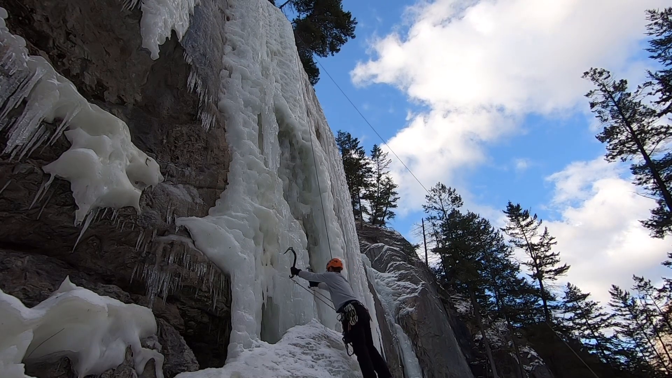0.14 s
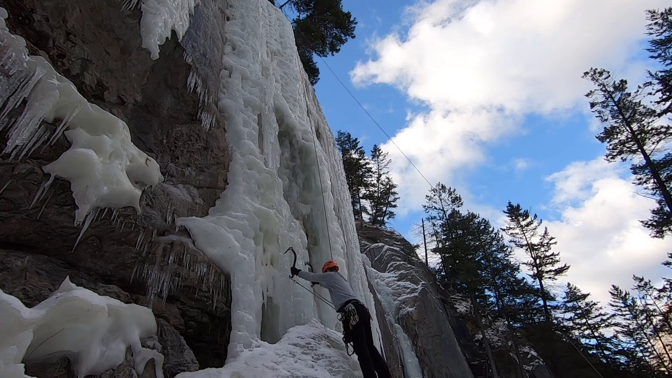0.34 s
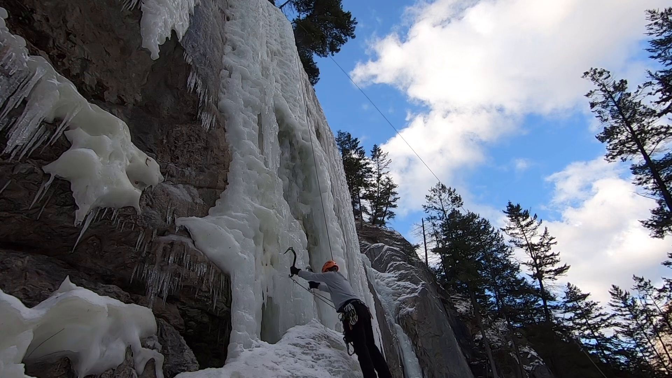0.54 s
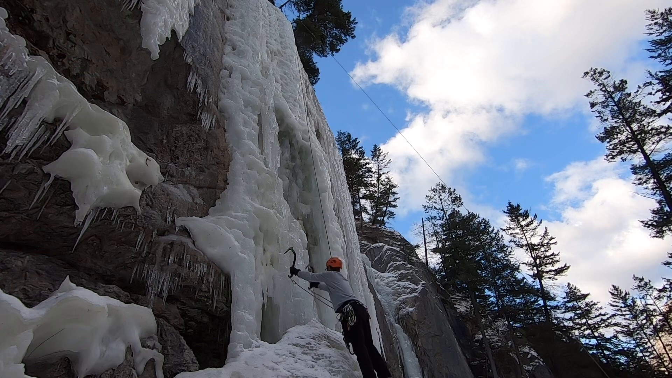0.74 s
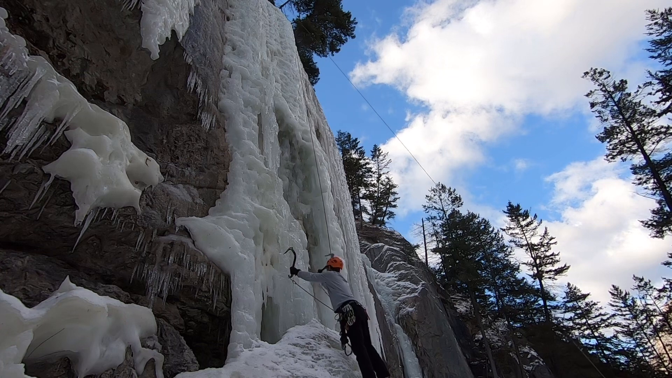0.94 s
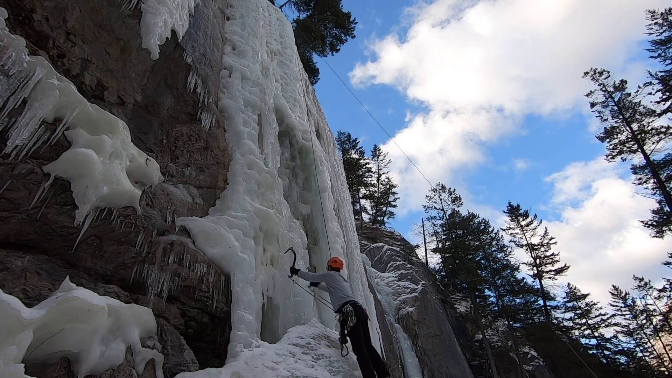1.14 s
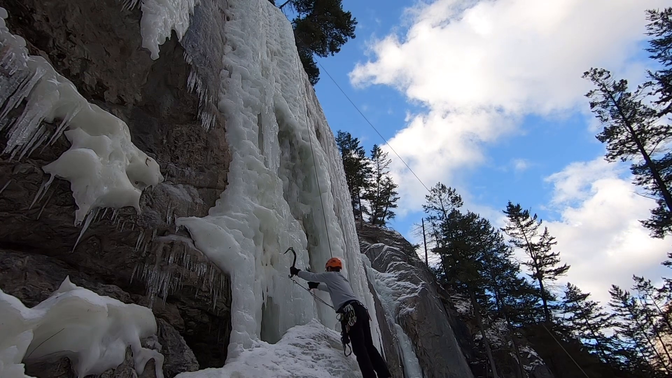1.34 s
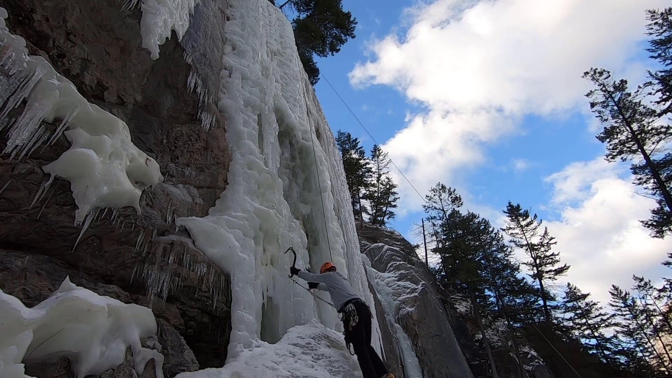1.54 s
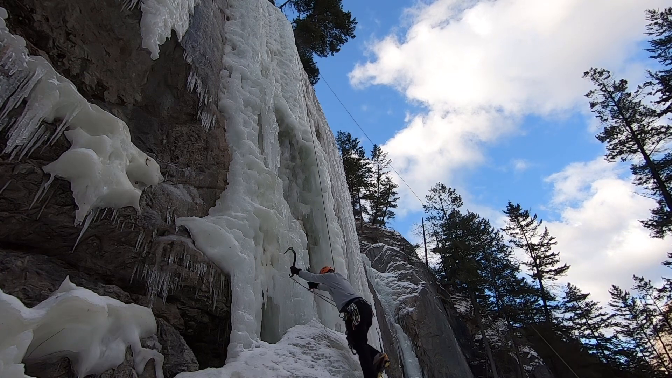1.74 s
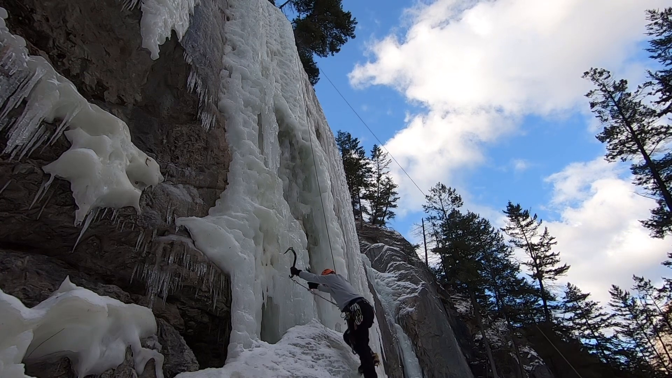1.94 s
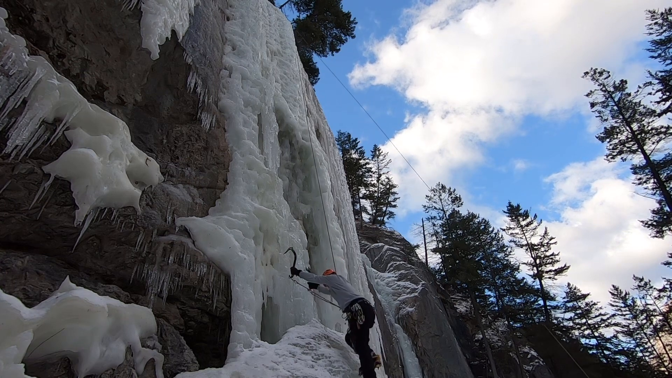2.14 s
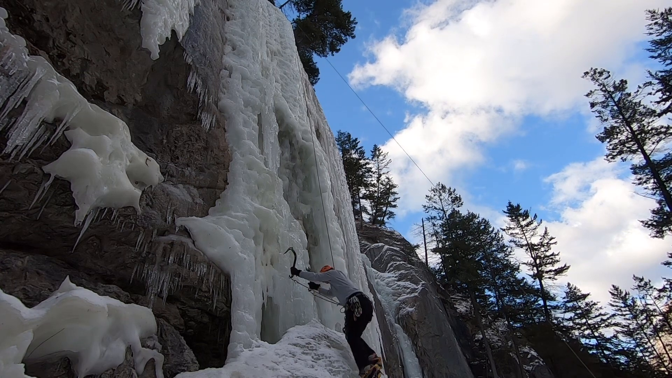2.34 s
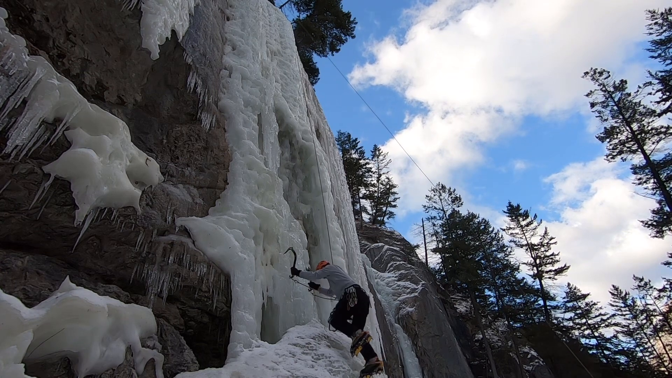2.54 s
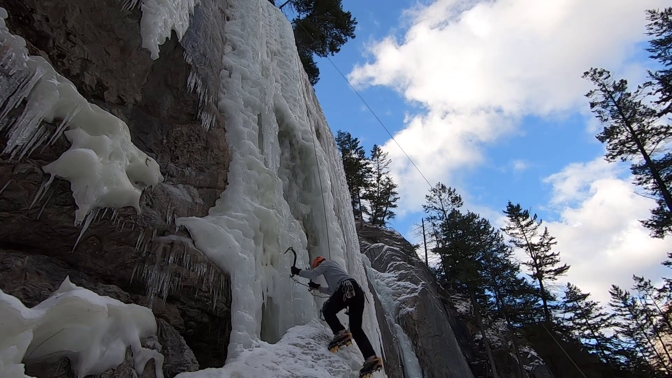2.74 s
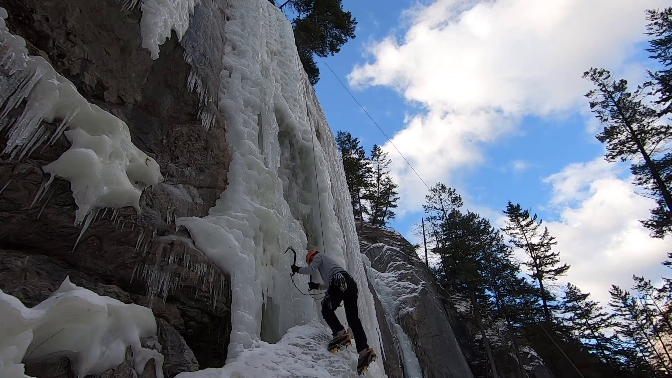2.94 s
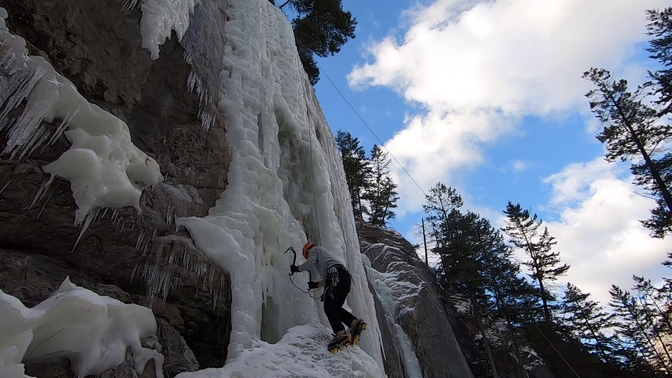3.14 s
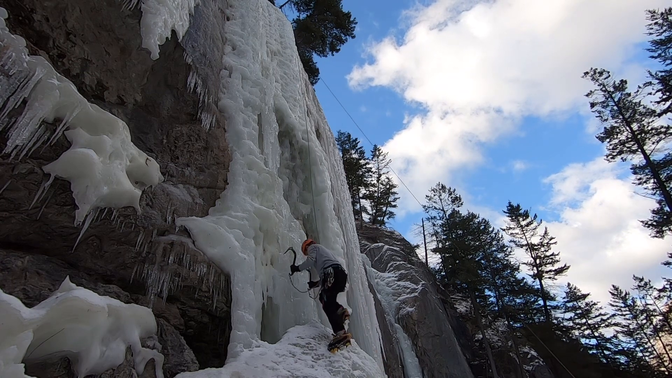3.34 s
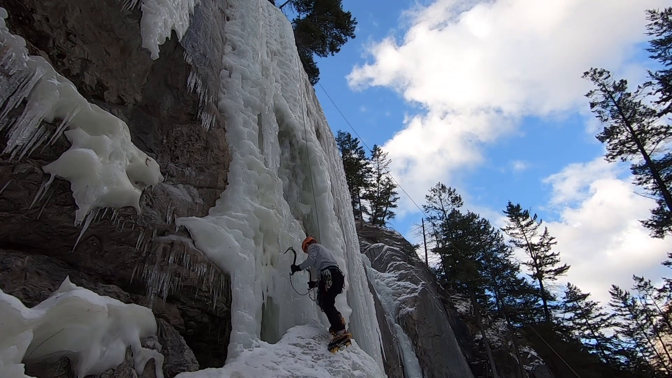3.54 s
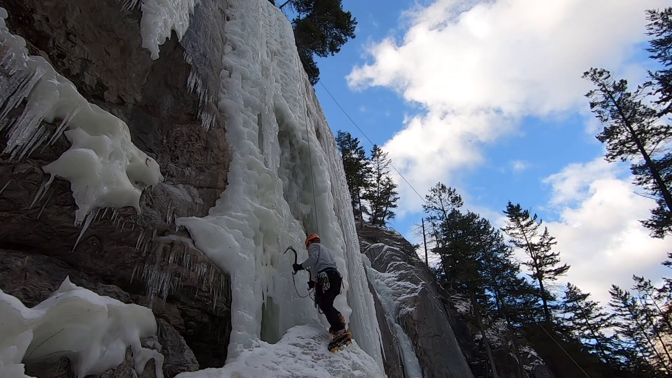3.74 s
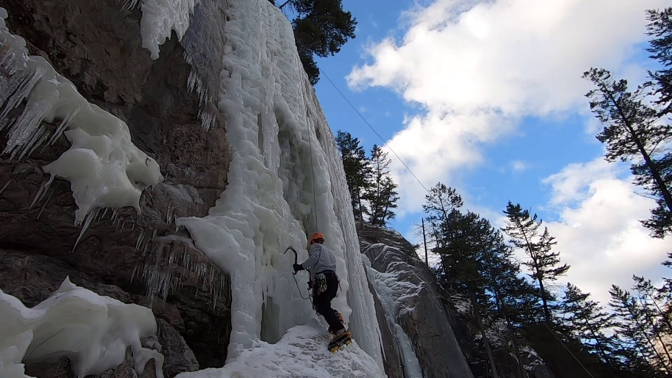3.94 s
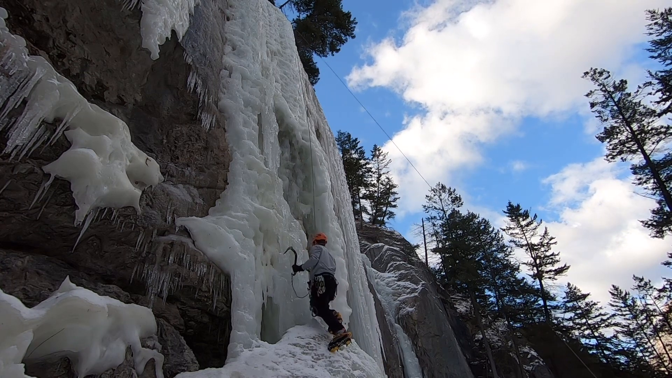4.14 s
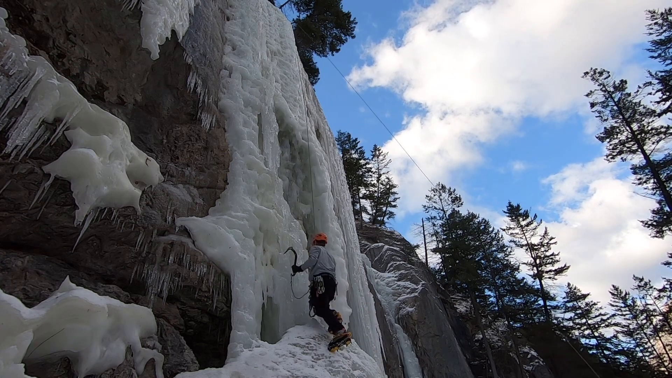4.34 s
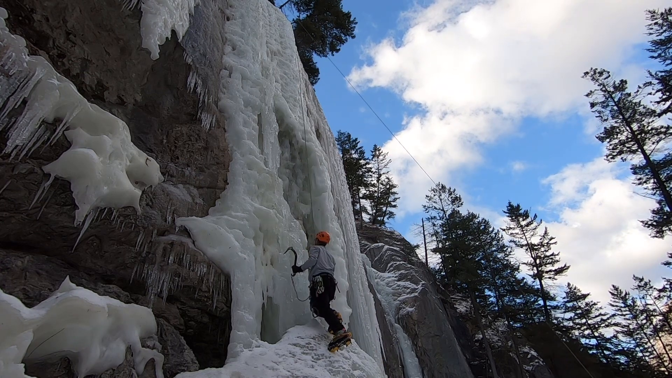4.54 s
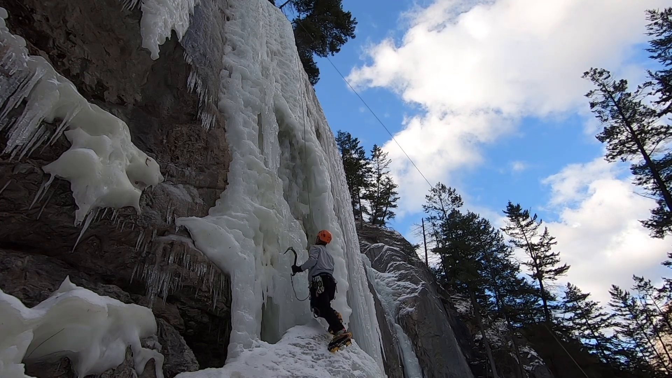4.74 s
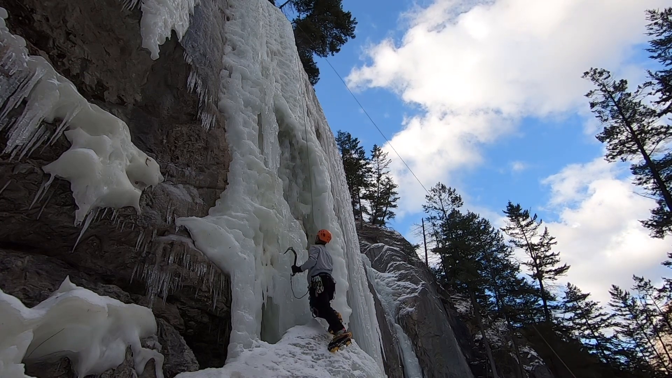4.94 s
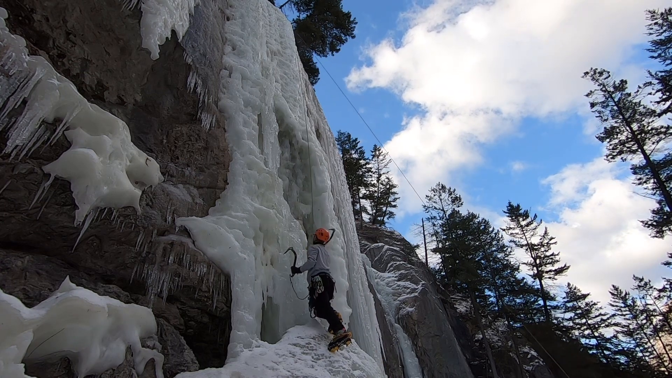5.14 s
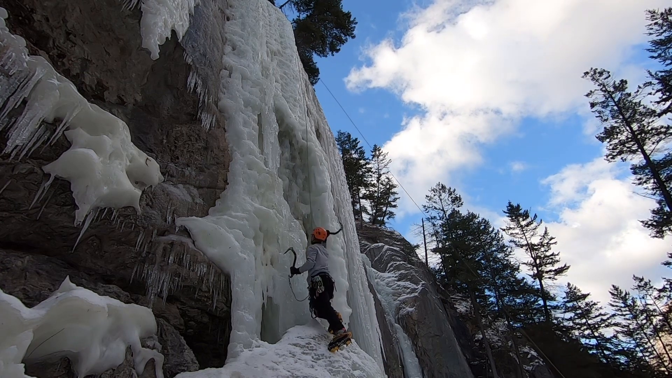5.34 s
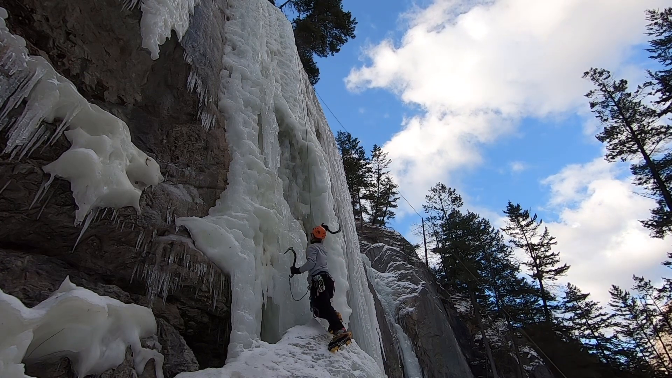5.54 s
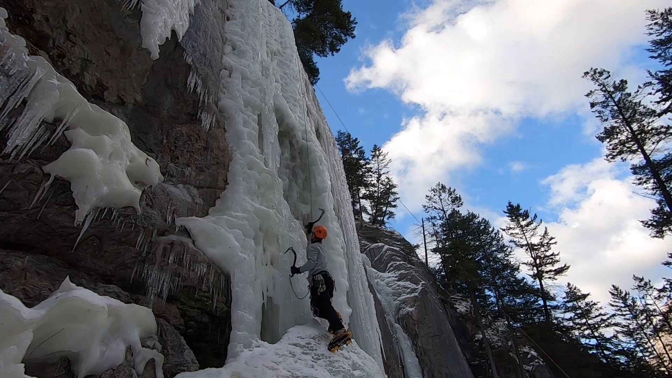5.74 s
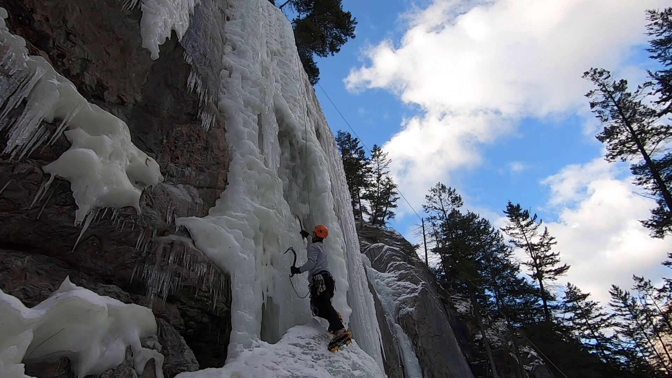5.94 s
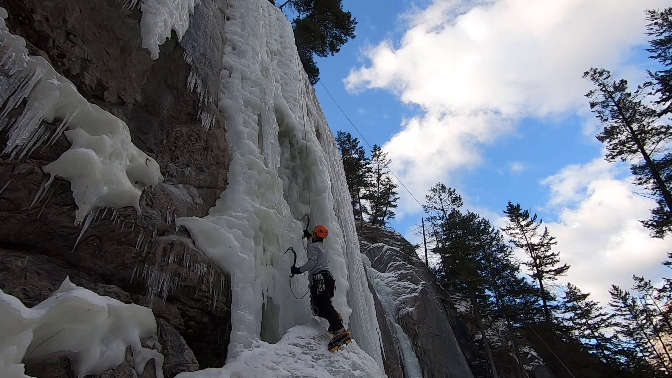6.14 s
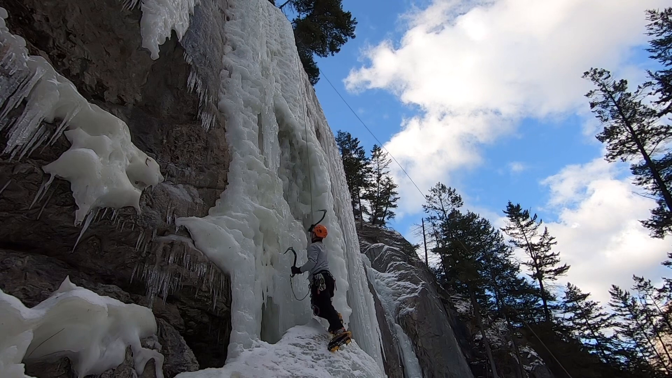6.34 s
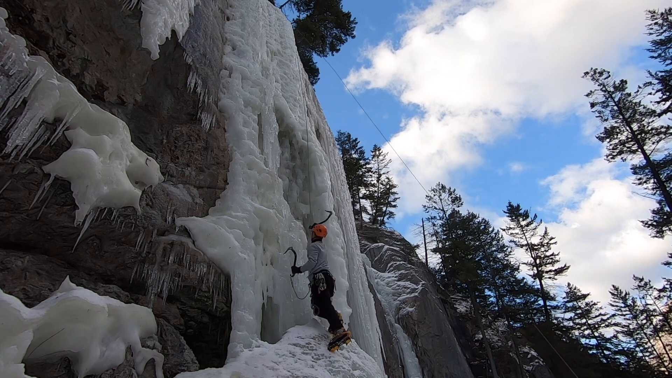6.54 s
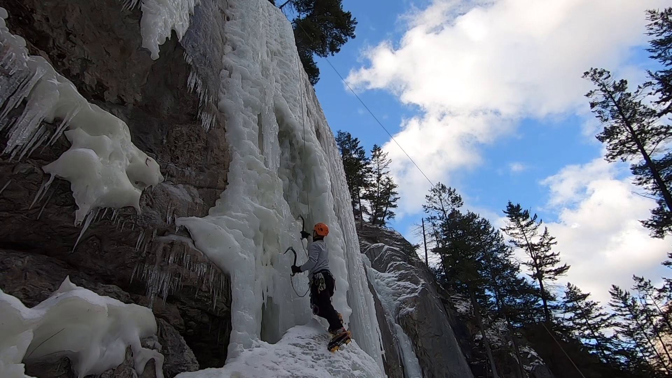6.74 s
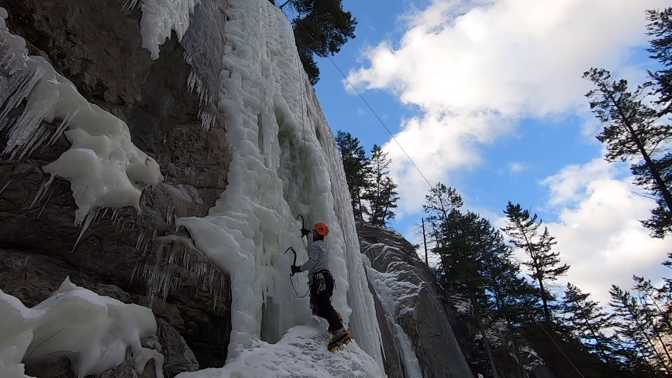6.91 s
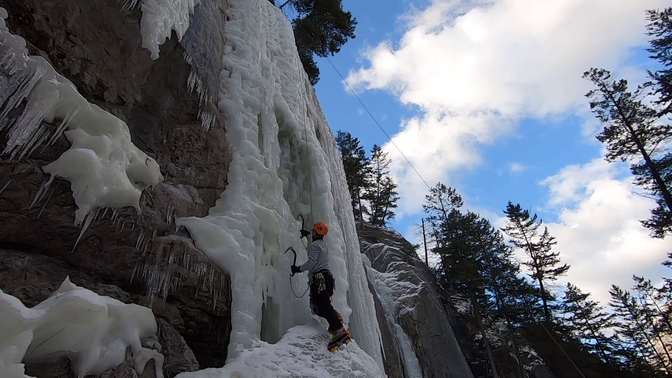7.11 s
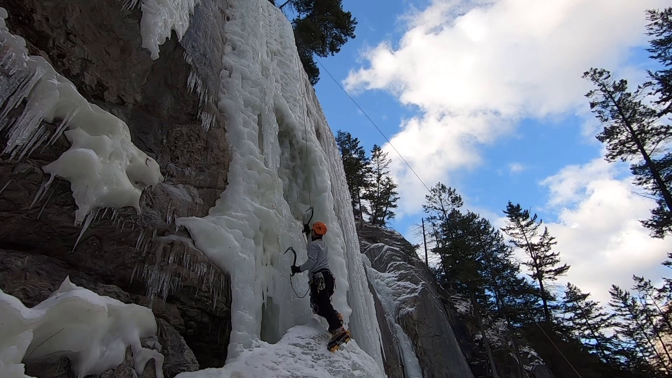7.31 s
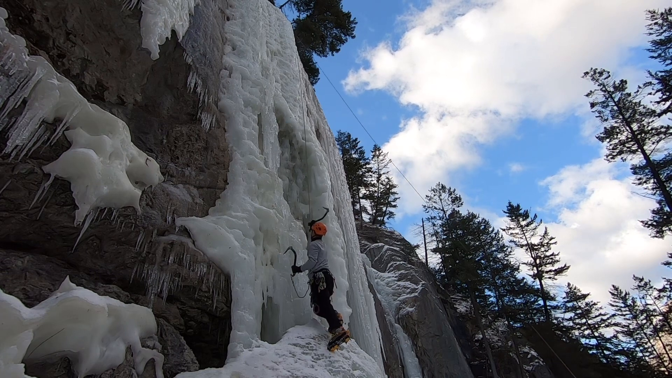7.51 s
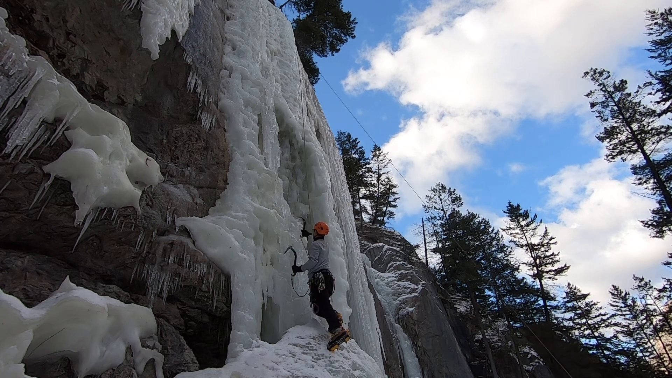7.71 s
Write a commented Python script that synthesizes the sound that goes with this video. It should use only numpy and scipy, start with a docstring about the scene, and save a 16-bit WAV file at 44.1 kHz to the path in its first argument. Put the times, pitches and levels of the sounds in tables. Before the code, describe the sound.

A soft wash of far water and air runs throughout, with faint gritty scuffing of snow and ice. The climber is some metres away, and blows on the ice have a short echo. Light steel taps click around 0.3 to 0.5 seconds, then a sharp, crunchy axe strike lands at 1.2. From about 2 to 2.8 seconds, crampon kicks and pick taps knock into slightly hollow ice, with soft low boot thuds. Small steel harness gear clinks brightly from 3 to 3.7 seconds, strongest near 3.4 along with another kick. A quieter stretch follows, with a brief scrape, a soft thud and a faint swell of air around 5.2. The loudest axe strike comes at 5.9 seconds, another at 6.7 and a last at 7.7. Small taps and scrapes fall between them, with one bright clink at 7.3.

```python
"""A wooded gully, some metres from a climber on a frozen waterfall. Axe picks and crampon points crush
the ice in bursts of tiny fractures that ring the tool and boom in the hollow curtain. Steel gear
clinks on the harness; boots thud through the snow and scuff up grit. Rock and trees throw back a
short echo over a soft bed of far water and air."""
import sys
import numpy as np
from scipy import signal
from scipy.fft import rfft, irfft
from scipy.io import wavfile

SR = 44100
rng = np.random.default_rng(int(sys.argv[2]) if len(sys.argv) > 2 else 0)


def store_pcm(level_fs):
    """Save levels as 16-bit WAV."""
    pcm = np.round(np.clip(level_fs, -1, 1) * 32767).astype(np.int16)
    wavfile.write(sys.argv[1], SR, np.atleast_2d(pcm).T)


N = 347067

# Full axe swings. Each row: start in seconds, level in dB, two tool ring centres in Hz, then ring,
# treble and boom trims in dB, rise in seconds.
AXE_SWINGS = [(1.184, -17, 2230, 1203, 5.5, -15.5, -18.5, 0.0028),
              (5.862, -11.5, 3640, 1202, -2, -18, -19.5, 0.0021),
              (6.7399, -19.5, 2230, 3200, 6, -12, -21, 0.0036),
              (7.703, -15.5, 2160, 3500, 3.5, -8, -17, 0.0042)]
# Small bites of steel on ice. Each row: start in seconds, level in dB, tool ring centre in Hz, # treble trim in
# dB, pan in dB (positive leans left, negative right).
PICK_TAPS = [(0.292, -32, 3000, -22, 0), (0.297, -31, 1850, -31, -1), (0.318, -39.5, 3460, -24, -1),
             (0.404, -34, 3820, -19, -1), (0.466, -29.5, 3420, -21, 1), (0.468, -33, 2850, -22, -3),
             (0.473, -29.5, 1490, -13, -1), (1.605, -40.5, 2800, -21, -14), (1.637, -45.5, 3300, -26, 1),
             (1.795, -42.5, 2220, -25, -21), (1.902, -41, 2400, -20, -13), (1.962, -26, 2820, -1, -3),
             (1.978, -43, 1200, 8, -1), (2.429, -24.5, 3380, -8, -4), (2.44, -36.5, 3020, 8.5, -1),
             (3.778, -41.5, 1260, -25, 0), (2.257, -41.5, 1950, 1, -4), (2.673, -46, 2810, 0, -18),
             (2.766, -25.5, 2150, -3.5, -3), (3.45, -31, 1890, 4, -8), (5.833, -34, 3500, -6, -1),
             (5.836, -28, 2600, -14, 1), (6.018, -37, 3250, -1, 2), (6.027, -29.5, 2790, -39, 2),
             (6.057, -37, 2740, -28, 3), (6.089, -39.5, 3000, -22, 2), (6.504, -34.5, 2970, -7, 1),
             (6.654, -31.5, 2440, -2.5, -6), (6.683, -38, 1100, -20, -11), (7.097, -40, 1760, -3.5, -1),
             (7.142, -38.5, 2470, -28, -12), (7.183, -53.5, 2500, 2.5, -17), (7.339, -38, 3170, -6, -18),
             (7.675, -28.5, 2250, -4, 1.5), (7.681, -27, 3600, -7, 0)]
# Crampon kicks. Each row: start in seconds, level in dB, tool ring centre in Hz, boom trim in dB,
# boom centre in Hz.
CRAMPON_KICKS = [(1.317, -45.5, 1040, 3.5, 181), (1.966, -32.5, 2500, 2, 304), (2.121, -55, 3780, 16, 277),
                 (2.389, -40, 966, 8.5, 417), (2.426, -28, 1300, 8.5, 348), (2.455, -48, 1300, 19.5, 436),
                 (2.754, -28.5, 1290, 0, 433), (3.437, -34, 1310, -3, 603), (3.777, -52, 902, 17, 317),
                 (3.945, -49.5, 999, 13, 317), (4.593, -50, 912, 9, 193), (6.613, -44, 902, 9.5, 160),
                 (7.674, -38, 1000, 3.5, 380)]
# Points dragged through ice. Each row: start in seconds, level in dB, treble and dull rub trims in dB,
# tool ring centre in Hz, pan in dB.
POINT_SCRAPES = [(0.405, -46.5, -7, -16, 2600, -1), (0.73, -51, -13, -3.5, 2220, -4),
                 (1.81, -51.5, -27, -8, 2400, -9), (1.886, -51.5, -26, -4, 1600, -20),
                 (2.65, -58, 10.5, -32, 2800, -1), (2.954, -45.5, -0.5, -14, 3740, -3),
                 (3.222, -47.5, -12, -37, 2130, -18.5), (4.51, -51.5, -22, -3, 1600, -16),
                 (5.2, -43, -11.5, -10, 1470, -22), (5.235, -42.5, -13.5, -8.5, 4100, -5),
                 (6.277, -55.5, 2.5, 0.5, 2200, -7), (7.365, -49.5, 0.5, -30, 3400, -1),
                 (7.47, -57, -8, 0, 2200, -11)]
# Modes of the tool and of the hollow ice. Each row: pitch in Hz, level in dB.
TOOL_MODES = [(1040, 3), (1200, 4.5), (1620, -3.5), (1920, 6.5), (2220, 2.5), (2780, 6.5), (3440, -7.5),
              (3850, 2), (4200, 1), (4900, -36.5)]
CURTAIN_MODES = [(134, -6.5), (315, -8), (467, -11), (629, -11)]
# Harness gear knocking. Each row: start in seconds, level in dB, pitch in Hz, pan in dB.
GEAR_CLINKS = [(0.477, -47, 7200, 2), (2.2353, -44.5, 8700, -3), (2.331, -45.5, 7030, -6.5),
               (2.8684, -47, 6840, -0.5), (2.927, -46, 7570, 0), (3.006, -32.5, 8640, -5.5),
               (3.021, -35, 7500, -7), (3.1793, -30, 7630, -6.5), (3.218, -33, 7560, -7),
               (3.333, -39, 7620, -8), (3.36, -33.5, 7770, -10.5), (3.404, -26.5, 7660, -10.5),
               (3.423, -25.5, 7930, -5.5), (3.4483, -21, 7760, -7.5), (3.466, -33.5, 8500, -15),
               (3.575, -30, 8180, -7), (3.6706, -37.5, 7950, -24.5), (3.711, -41, 7600, -5),
               (7.34, -26.5, 7900, -6), (7.585, -39.5, 8060, -5)]
# Thin steel rubbing. Each row: start in seconds, peak in dB, pitch in Hz, fade time in seconds.
GEAR_RUBS = [(0.483, -37, 6860, 0.037), (2.558, -49, 7500, 0.057), (2.662, -51, 9370, 0.2),
             (2.663, -51, 7350, 0.16), (2.573, -51, 9370, 0.039), (2.78, -44, 7900, .04),
             (3.056, -51, 12000, 0.045), (3.45, -46, 7700, .05), (3.467, -38, 9200, 0.037),
             (3.9, -51, 8350, 0.056), (7.102, -44.5, 8830, .03), (7.478, -41.5, 9390, 0.069)]
# Weight landing on a boot. Each row: start in seconds, deep push in dB, upper thud in dB.
BOOT_LANDINGS = [(1.85, -64, -70), (1.972, -44.5, -42.5), (2.42, -57, -35.5), (2.763, -58, -44),
                 (3.047, -66, -55.5), (3.449, -57, -40), (3.61, -56, -71), (4.439, -55, -57),
                 (4.794, -76, -54), (5.221, -48, -45), (6.6, -53.5, -51.5), (7.667, -61, -68)]
# Fader moves for boots, rope and loose ice. Each row: time in seconds, grit in dB, dull rub in dB.
SCUFF_LEVELS = [(0.0, -62.5, -58.5), (1.14, -77, -62), (2.06, -58, -56.5), (2.41, -63.5, -61),
                (3.51, -59, -55), (3.62, -55, -50.5), (3.88, -76.5, -57), (4.23, -71.5, -60),
                (4.65, -75, -54.5), (4.86, -71, -60.5), (5.83, -70, -63), (6.03, -53.5, -62),
                (6.4, -64, -67.5), (6.58, -61.5, -56.5), (6.73, -51.5, -46), (6.93, -64.5, -60.5),
                (7.69, -70, -65), (7.87, -58, -78)]
# EQ curves for cracks, splinters, grit and the bed. Each row: frequency in Hz, relative gain in dB.
CRACK_EQ = [(290, -51), (500, -7), (1170, -0.5), (1890, 0), (2210, -8.5), (2480, -4.5), (3490, -1.5),
            (6000, -16.5), (7800, -21.5), (13200, -120)]
SPLINTER_EQ = [(2650, -16), (4500, 9), (5220, 7), (6810, 5.5), (9560, 8), (11300, -13.5), (14100, -13),
               (16000, -42)]
GRIT_EQ = [(350, -61.5), (600, -11.5), (823, -5.5), (2040, -5.5), (3850, -6), (6180, -18), (8050, -11),
           (11600, -31.5), (14000, -38)]
WASH_EQ = [(25, -9), (86, -59), (156, -5), (285, -6.5), (593, -12), (833, -4), (1780, -18.5), (3250, -20.5),
           (5630, -23), (9010, -19.5), (10300, -28), (11700, -57), (13000, -45)]
# Width of the bed. Each row: frequency in Hz, left-right likeness (1 or more is mono, negative is wide).
WASH_LIKENESS = [(60, -0.52), (130, 0.39), (290, 0.38), (640, -0.18), (1410, -1.37), (3100, 1),
                 (6820, -0.31), (15000, -0.18)]
# Balance of the bed. Each row: frequency in Hz, pan in dB.
WASH_PAN = [(60, -6), (240, 3), (950, -6), (3770, -2), (15000, 0)]

TOOL_T60_S, CURTAIN_T60_S = 0.015, 0.043   # hand and ice damp the tool
PICK_BOOM_HZ = 332
SHUDDER_DB, SHUDDER_S = -13.5, 0.015   # the tool shakes on after the bite
FIRM_KICK_DB = -40   # softer kicks lose their treble
PUSH_HZ, PUSH_S, THUD_HZ, THUD_S = 67, 0.13, 150.4, 0.072
WASH_DB, RUMBLE_DB = -58, -61
RUSH_PEAK_S, RUSH_WIDTH_S, RUSH_DB, RUSH_HZ = 5.2, 0.37, -57.5, 940


def steel_on_ice():
    """Points crush ice into dense fractures; returns the crack and the ringing of tool and curtain."""
    fracture, heave = grains(12000, spread_db=2.5), grains(4000, spread_db=2.5)
    crunch = from_db(3.5 * drift(110))   # the ice gives way in lumps
    broad, bright, ringing = strikes(fracture, heave, crunch) + scrapes(fracture, heave, crunch)
    splinters = np.array([fracture + heave, fracture - heave])   # thrown wide
    crack = from_db(-9.5) * colour(broad * fracture, CRACK_EQ)
    crack += from_db(-11) * colour(bright * splinters, SPLINTER_EQ)
    return crack, ringing


def blows():
    """One cue list of sharp swings, quick taps and slower, duller kicks."""
    for s, db, hz, other_hz, knock_db, treble_db, boom_db, rise_s in AXE_SWINGS:
        yield s, db, [hz, other_hz], treble_db, knock_db, boom_db, PICK_BOOM_HZ, rise_s, 1
    for s, db, hz, treble_db, pan_db in PICK_TAPS:
        yield s, db, [hz], treble_db, -1, -18, PICK_BOOM_HZ, 0.00095, pan_db
    for s, db, hz, boom_db, boom_hz in CRAMPON_KICKS:
        treble_db = -10 - 5 * max(FIRM_KICK_DB - db, 0)
        yield s, db, [hz], treble_db, -1, boom_db, boom_hz, 0.0063, -5.5


def strikes(fracture, heave, crunch):
    """Each bite knocks the tool and booms the ice; returns crack and splinter envelopes, and ringing."""
    broad, bright, ringing = layers = np.zeros((3, 2, N))
    for s, db, centres_hz, treble_db, knock_db, boom_db, boom_hz, rise_s, pan_db in blows():
        t, span = window(s)
        rise = t / rise_s
        bite = rise ** 2 * np.exp(1 - rise ** 2)
        crumbs = from_db(-1) * np.minimum(rise, 1) ** 2 * np.exp(-t / (rise_s + 0.0067))
        force = from_db(db) * (bite + crumbs)
        add(broad, s, force * pan(pan_db))
        add(bright, s, from_db(treble_db) * force * pan(pan_db))
        shudder = from_db(SHUDDER_DB) * np.minimum(rise, 1) * np.exp(-t / SHUDDER_S)
        jolt = (bite + shudder) * crunch[span] * fracture[span]
        knock = body(jolt, TOOL_MODES, centres_hz, TOOL_T60_S, db_per_octave=12)
        boom = body(force * heave[span], CURTAIN_MODES, [boom_hz], CURTAIN_T60_S, db_per_octave=17.5)
        add(ringing, s, from_db(db + knock_db) * peak_one(band(knock, 510, 5800)) * pan(pan_db))
        add(ringing, s, from_db(db + boom_db) * peak_one(band(boom, 166, 840))[None])
    return layers


def scrapes(fracture, heave, crunch):
    """A dragged point grinds, rubs dully and rings the tool; returns the same layers as strikes."""
    broad, bright, ringing = layers = np.zeros((3, 2, N))
    for s, db, treble_db, dull_db, hz, pan_db in POINT_SCRAPES:
        t, span = window(s)
        force = from_db(db) * np.minimum(t / 0.0095, 1) * np.exp(-(t / 0.061) ** 3) * crunch[span]
        add(broad, s, force * pan(pan_db))
        add(bright, s, from_db(treble_db) * force * pan(pan_db))
        add(ringing, s, from_db(dull_db) * force * rms_one(band(heave[None, span], 240, 1630)))
        grind = body(force * fracture[span], TOOL_MODES, [hz], TOOL_T60_S, db_per_octave=45)
        add(ringing, s, from_db(-14.5) * grind * pan(pan_db))
    return layers


def body(drive, modes, centres_hz, t60, db_per_octave):
    """The drive rings every mode of tool or ice, most strongly those near the given centres."""
    click = signal.unit_impulse(SR // 10)
    response = 0
    for k, (hz, db) in enumerate(modes):
        octaves_away = np.abs(np.log2(hz / np.array(centres_hz))).min()
        response += (-1) ** k * from_db(db - db_per_octave * octaves_away) * ring(click, hz, t60)
    return signal.fftconvolve(drive, response / np.linalg.norm(response))


def gear_clinks():
    """Small steel parts rattle together for a few milliseconds: a short ring with higher partials."""
    out, t = np.zeros((2, N)), np.arange(SR // 5) / SR
    for (s, db, hz, pan_db), chance in zip(GEAR_CLINKS, rng.standard_normal((len(GEAR_CLINKS), 4))):
        touch = rng.standard_normal(len(t)) * (t * np.exp(-t / 0.0012) + 9e-5 * np.exp(-t / 0.028))
        tone = ring(touch, hz, t60=0.022)
        tone += from_db(2) * ring(touch, (1.07 + 0.04 * chance[0]) * hz, t60=0.005)
        tone = band(tone, 0.85 * hz, 1.2 * hz)
        tone += from_db(-12 + 4 * chance[1]) * ring(touch, 1.2 * hz, t60=0.008)
        tone += from_db(-26 + 4 * chance[2]) * ring(touch, 13200 + 1900 * np.tanh(chance[3]), t60=0.01)
        lag = round(-0.3 * pan_db)   # samples: the far side hears it later
        stereo = np.array([np.roll(tone, max(lag, 0)), np.roll(tone, max(-lag, 0))])
        add(out, s, from_db(db) * peak_one(stereo) * pan(pan_db))
    return out


def gear_rubs():
    """Thin steel parts brush together and sing at two close pitches."""
    out, t = np.zeros((2, N)), np.arange(SR // 5) / SR
    for s, db, hz, fade_s in GEAR_RUBS:
        brush = rng.standard_normal((2, len(t))) * np.exp(-(t / fade_s) ** 2)
        tone = ring(brush, hz, t60=0.03) + from_db(-7) * ring(brush, 0.95 * hz, t60=0.015)
        add(out, s, from_db(db) * peak_one(tone))
    return out


def boot_thuds():
    """Weight sinks into snow: a deep swing of pressure and a shorter thud, both roughened by rumble."""
    out = np.zeros((2, N))
    mid, side = rng.standard_normal((2, N))
    noise = np.array([mid + 0.092 * side, mid - 0.12 * side])
    deep, upper = rms_one(band(noise, 32, 180)), rms_one(band(noise, 119, 268))
    for s, push_db, thud_db in BOOT_LANDINGS:
        for db, hz, length_s, low in (push_db, PUSH_HZ, PUSH_S, deep), (thud_db, THUD_HZ, THUD_S, upper):
            t, span = window(s, length_s)
            swell = np.sin(np.pi * np.sqrt(t / t[-1])) ** 2
            pressure = np.sin(2 * np.pi * hz * t) + 1.1 * low[:, span]
            add(out, s, from_db(db) * swell * pressure)
    return band(out, 48, 353)


def scuff():
    """Boots and rope shift clumped grains of snow and ice; chips tinkle over a dull rub."""
    s, grit_db, dull_db = np.transpose(SCUFF_LEVELS)
    t = np.arange(N) / SR
    mid, side = grains(5000, spread_db=2.5), grains(4600, spread_db=-0.5)
    grit = colour(np.array([mid + 0.5 * side, mid - 1.08 * side]), GRIT_EQ)
    chips = sum(ring(grains(25, spread_db=11.5), hz, t60=0.0088) * pan(rng.normal(0, 5.6))
                for hz in np.geomspace(2000, 4200, 6))
    grit += from_db(-21) * rms_one(chips)
    grit *= from_db(np.interp(t, s, grit_db) + 2.5 * drift(57)) * pan(-0.45)
    dull = rms_one(band(grains(3000, spread_db=2.5), 125, 1014))
    return grit + dull * from_db(np.interp(t, s, dull_db) + 1.5 * drift(15))


def gully_echo(x):
    """Rock, ice and trees scatter the sound; the pattern changes each half second as the climber moves."""
    out, step = np.zeros((2, N)), SR // 2
    t = np.arange(step) / SR
    tail = from_db(-30) * np.minimum(t / 0.007, 1) * from_db(-60 * t / 0.26)
    treble_fade = from_db(-60 * t / 17)   # the top dies slightly sooner
    for at in range(0, N, step):
        mid, side = rng.standard_normal((2, step))
        scatter = tail * np.array([mid + 0.95 * side, mid - 0.58 * side])
        scatter = band(scatter, 200, 3200) + band(scatter, 1890, 22000) * treble_fade
        send = x[:, at:at + step].mean(0, keepdims=True)
        add(out, at / SR, signal.fftconvolve(send, scatter, axes=1))
    return out


def water_and_air():
    """A far wash of flickering half-octave noise bands, a low rumble and one soft passing rush."""
    wash, shared_drift = 0, drift(1.5)
    edges_hz = 22 * 2 ** np.arange(0, 9.6, 0.5)
    white = rng.standard_normal((2, 2, N))
    for k, (low, high) in enumerate(zip(edges_hz, edges_hz[1:])):
        mid, side = band(white[k % 2], low, high)
        hz = np.sqrt(low * high)
        alike = np.clip(at_hz(WASH_LIKENESS, hz), -1, 1)
        gain = from_db(1.5 * shared_drift + 1.4 * drift(8.3)) * pan(at_hz(WASH_PAN, hz))
        wash += gain * (np.sqrt(1 + alike) * mid + np.sqrt(1 - alike) * side * [[1], [-1]])
    rumble = from_db(RUMBLE_DB + 2.3 * drift(5.3)) * rms_one(band(band(wash, 143, 205), 143, 205))
    swell = np.exp(-((np.arange(N) / SR - RUSH_PEAK_S) / RUSH_WIDTH_S) ** 2)
    rush = from_db(RUSH_DB) * swell * rms_one(band(wash, 0.83 * RUSH_HZ, 1.15 * RUSH_HZ))
    return from_db(WASH_DB) * rms_one(colour(wash, WASH_EQ)) + rumble + rush


def grains(per_s, spread_db):
    """Tiny fractures of uneven size at random moments; rms 1."""
    sizes = from_db(spread_db * np.minimum(rng.exponential(1, N), 4)) * rng.choice([-1, 1], N)
    return rms_one(sizes * (rng.random(N) < per_s / SR))


def ring(x, hz, t60):
    """One resonance that falls 60 dB in t60 seconds."""
    r, w = from_db(-60 / (t60 * SR)), 2 * np.pi * hz / SR
    return signal.lfilter([0, np.sin(w)], [1, -2 * r * np.cos(w), r * r], x + 1e-18)


def drift(rate_hz):
    """A smooth random wobble; rms about 1."""
    hop = 40
    r = np.exp(-2 * np.pi * rate_hz * hop / SR)
    slow = signal.lfilter([1], [1, -2 * r, r * r], rng.standard_normal(N // hop + 2002))[2000:]
    return np.interp(np.arange(N) / hop, np.arange(len(slow)), rms_one(slow))


def colour(x, eq):
    """Minimum-phase EQ with no pre-ring; white noise keeps its rms."""
    hz = np.linspace(0, SR / 2, 2049)
    cepstrum = irfft(np.log(from_db(at_hz(eq, np.maximum(hz, 1)))))
    cepstrum[1:2048] *= 2
    cepstrum[2049:] = 0
    taps = irfft(np.exp(rfft(cepstrum)))
    return signal.oaconvolve(x, (taps / np.linalg.norm(taps))[None], axes=1)[:, :N]


def band(x, low_hz, high_hz):
    return signal.sosfilt(signal.butter(2, [low_hz, high_hz], "band", fs=SR, output="sos"), x + 1e-18)


def at_hz(curve, hz):
    points_hz, values = np.transpose(curve)
    return np.interp(np.log(hz), np.log(points_hz), values)


def from_db(db):
    return 10 ** (np.asarray(db) / 20)


def rms_one(x):
    return x / np.sqrt(np.mean(x ** 2) + 1e-20)


def peak_one(x):
    return x / np.abs(x).max()


def pan(db):
    return from_db([[db / 2], [-db / 2]])


def window(s, length_s=0.25):
    """An event's own clock in seconds and its slice of the timeline."""
    at = round(s * SR)
    end = min(at + round(length_s * SR), N)
    return np.arange(end - at) / SR, slice(at, end)


def add(out, s, piece):
    at = round(s * SR)
    out[:, at:at + piece.shape[1]] += piece[:, :N - at]


def scene():
    """Steel on ice up front with its echo; gear, boots and the bed stay dry."""
    crack, ringing = steel_on_ice()
    gear = gear_clinks() + gear_rubs()
    # Less ringing goes into the echo, so its tail stays noisy rather than pitched.
    echo = gully_echo(crack + from_db(-11) * ringing)
    return crack + ringing + gear + echo + boot_thuds() + scuff() + water_and_air()


def record(dry):
    """A steep high cut, 70 dB down from 16.5 kHz."""
    return signal.sosfilt(signal.cheby2(12, 70, 16500, fs=SR, output="sos"), dry)


dry = scene()
out = record(dry)
store_pcm(out)
```